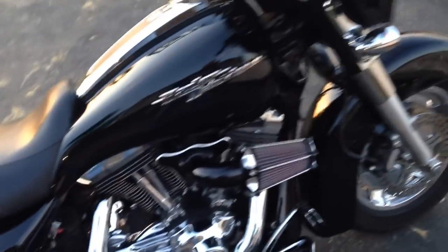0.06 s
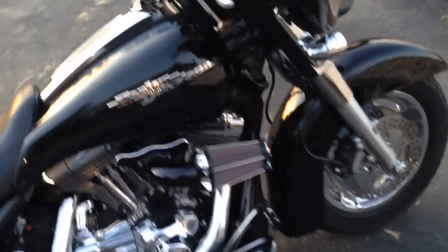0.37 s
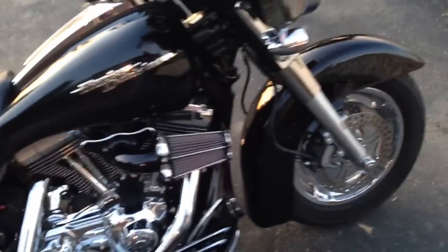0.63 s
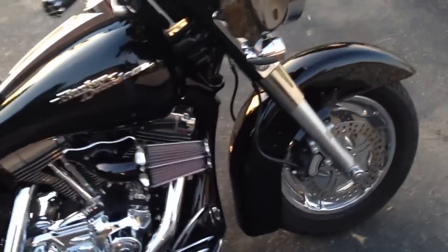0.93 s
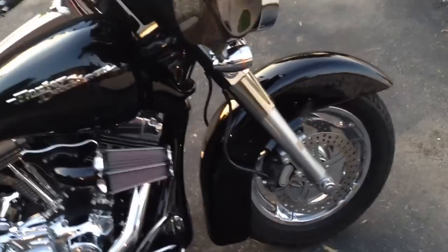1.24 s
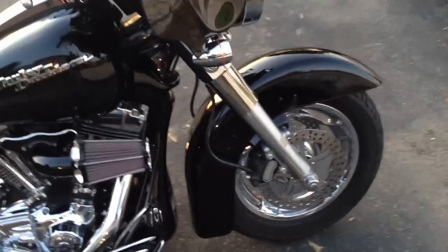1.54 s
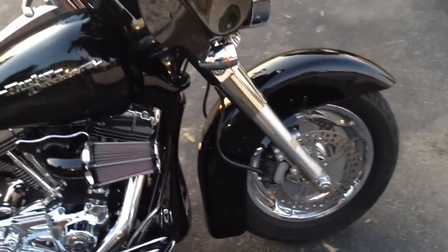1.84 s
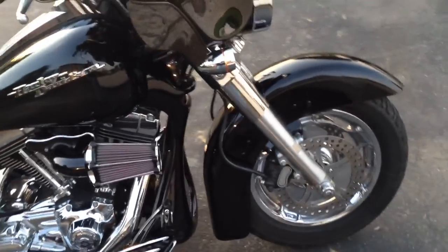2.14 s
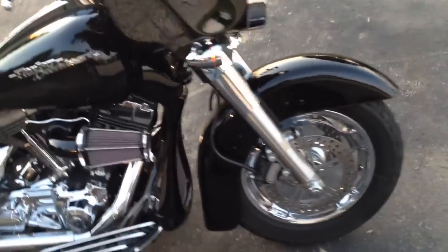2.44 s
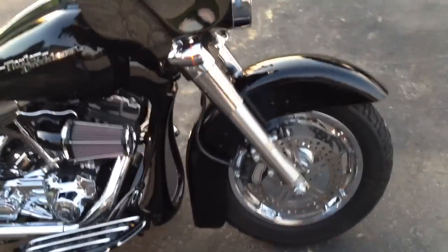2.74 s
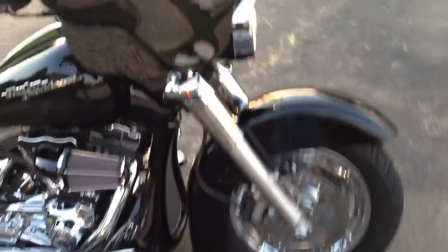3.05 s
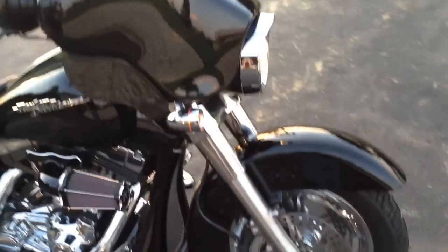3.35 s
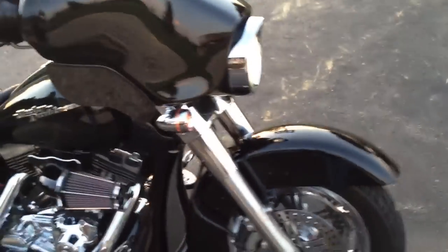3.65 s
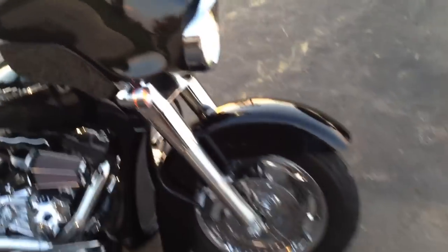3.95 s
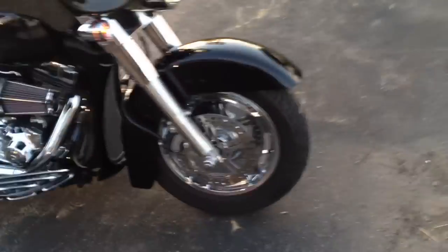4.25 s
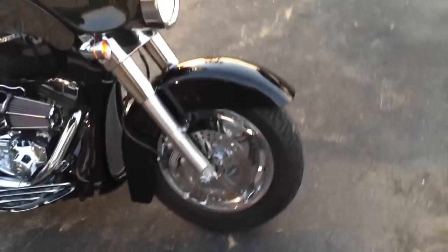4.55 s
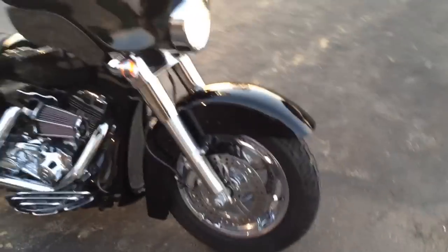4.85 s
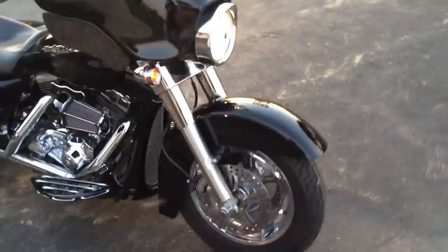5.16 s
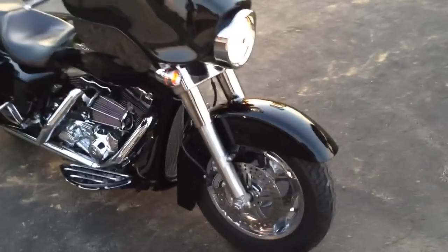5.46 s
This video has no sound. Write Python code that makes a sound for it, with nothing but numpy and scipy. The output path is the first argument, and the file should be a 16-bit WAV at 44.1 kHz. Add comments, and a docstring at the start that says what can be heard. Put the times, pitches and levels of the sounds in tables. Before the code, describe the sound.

Close, lumpy idle of a parked twin-cylinder motorcycle, its exhaust thudding and occasionally skipping over light metallic engine clatter.

```python
"""A big V-twin motorcycle idles in a parking lot, about eight cycles a second, with an uneven, loping beat.
One cylinder thuds, the other rings its pipe and now and then barely fires; gas rasps after every beat.
The hunting crankshaft speed times every beat and valve tap; the metal clatters close to a hand-held
microphone that drifts from beside the cylinders, past the fork, to ahead of the bike."""
import sys
import numpy as np
from scipy import signal
from scipy.fft import rfft, irfft, next_fast_len
from scipy.io import wavfile

SR = 44100
rng = np.random.default_rng(int(sys.argv[2]) if len(sys.argv) > 2 else 0)


def unload_audio(sound):
    """Save the sound as a 16-bit wav file, at the path given as the first command line argument."""
    columns = np.transpose(np.atleast_2d(sound))
    # keep every value between -1 and 1, then stretch to whole-number steps
    steps = np.round(np.clip(columns, -1, 1) * 32767)
    wavfile.write(sys.argv[1], SR, steps.astype(np.int16))


N = 250929

# resonances of each cylinder's exhaust pipe: (Hz, width Hz, dB, polarity at the outlet)
STEADY_PIPE = [(68.7, 7.15, 19.5, -1.0), (90.7, 10.2, 13.5, -1.0), (108, 8.5, 8, -1.0), (121, 80, 2, 1.0),
               (170.4, 10.2, 13.5, 1.0), (256, 130, -2, -1.0), (275.5, 44, -1.5, 1.0),
               (393, 33, 0, 1.0)]
LOPING_PIPE = [(70.3, 5.1, 18.5, -1.0), (90.4, 10.2, 13, -1.0), (106.2, 61.5, 16.5, 1.0),
               (129.8, 80.8, 20.5, -1.0), (167.3, 9.24, 25, 1.0), (213.6, 79, 8.5, 1.0),
               (267.8, 10.3, 3.5, -1.0), (428, 15, -7, 1.0)]
RUMBLE = [(15, -18), (30, -15), (65, 0), (170, 0), (210, -8), (400, -30), (900, -70)]  # fixed
# colour of the clatter beside the cylinders and beside the fork: (Hz, dB per Hz)
BESIDE_ENGINE = [(400, -52), (700, -0.5), (1000, 0.5), (1250, -3.5), (1600, 1), (2050, 0.5), (2400, -2), (3000, -2), (4700, -3), (6500, -9), (8000, -10.5), (11000, -17), (15400, -25)]
BESIDE_FORK = [(400, -20), (750, -4), (1250, -1), (1700, -2.5), (2000, -1.5), (2330, -6), (2700, -5), (3300, -1.5), (4400, -4.5), (6300, -6.5), (8000, -10), (11000, -17), (15400, -22)]
# ringing of the fins and of the covers: (Hz, width Hz, dB)
FINS = [(890, 75, 5), (1420, 40, 4.5), (1700, 130, 6), (2430, 110, 4), (2750, 60, 2), (3880, 170, 0), (5600, 220, -5)]  # fixed
COVERS = [(1410, 25, -3), (1740, 90, -1), (2290, 90, 4), (2400, 60, 1), (3230, 60, 3), (3450, 110, 0), (4270, 110, -5), (5600, 200, -10)]  # fixed
TOP_HZ = 15500  # fixed
# the hunting idle: (s, crankshaft rpm)
SPEED = [(0.0, 971.2), (0.4, 1022.2), (0.58, 969.9), (1.21, 983.3), (1.36, 931.0), (2.04, 960.4), (2.19, 898.4),
         (2.82, 1016.4), (3.21, 1040.5), (3.33, 985.1), (3.48, 1030.4), (4.25, 968.1), (4.53, 999.2), (4.82, 956.7),
         (4.92, 1015.0), (5.69, 952.4)]  # fixed
# where in the two-turn cycle each cylinder exhausts, and the valves close (cycles)
STEADY_AT, LOPING_AT, SEAT_AT = .2507, .691, .935  # fixed
STUMBLE_S = 0.002  # how late the next beat comes after a complete misfire
# how hard each cylinder fires: (s, strength dB)
STEADY_EFFORT = [(.35, 3), (.6, 0.5), (1.5, 0.5), (1.8, 2.4), (2.3, 0), (3.8, 0.5), (4.1, -0.5), (5.6, -1.5)]
LOPING_EFFORT = [(1.06, 3), (1.22, -2), (2.33, -0.7), (2.65, 1), (4.4, 1.3), (4.88, .6), (5.1, -1.5), (5.6, -1.5)]
# misfires of the loping cylinder: (s, drop in strength dB)
MISFIRES = [(.44, -7.5), (.69, -8.5), (.93, -8), (3.29, -4), (3.76, -6), (4.01, -13.5), (4.24, -10), (4.49, -20), (4.74, -21), (4.98, -4)]
# the microphone drifts forward: (s, place: 0 beside the cylinders, 1 beside the fork, 2 ahead of the bike)
PATH = [(1.1, 0.054), (1.9, 0.8), (3.1, 2.1), (4, 1.95)]
# loudness at the microphone: (s, exhaust rasp dB, engine clatter dB)
LOUDNESS = [(0, -30.5, -34), (1.83, -31, -37.5), (3, -28.5, -35.5), (4.3, -29, -38.5), (4.9, -28.5, -38), (5.65, -31, -40)]
# valve clicks heard from the three places (dB)
CLICK_DB = [-33.5, -32.5, -36.5]
# modes of each cylinder's rocker box: (Hz, dB from beside the cylinders, dB from beside the fork, dB from ahead)
STEADY_ROCKER = [(2266, -39, -43, -42), (2740, -34.5, -44, -38), (3025, -39, -33, -50), (3390, -39, -28, -40)]
LOPING_ROCKER = [(1720, -38, -45, -43), (2310, -40, -36, -34), (3420, -44, -32, -46)]
# valve taps that knock harder than the rest: (s, extra ring dB)
KNOCKS = [(.88, 3.5), (1.12, 5), (1.63, 7.5), (1.93, 5), (2.01, 1), (2.58, 7), (2.77, 6), (3.06, 11), (4.62, 3), (4.86, 9), (5.05, 4)]
# colour of the exhaust gas: (Hz, dB per Hz beside the cylinders, beside the fork, ahead)
RASP_COLOUR = [(120, -6, -3.5, -4.5), (233, 1, 0, -3.5), (297, -4, -0.5, -8), (390, 3, 0, 1.5), (458, -5, -2, -0.5),
               (619, -7, -9, -10), (772, -15, -16.5, -17.5), (1200, -24.5, -21, -26), (3000, -38, -41, -39.5)]
# colour of the clatter ahead of the bike: (Hz, dB per Hz)
AHEAD = [(400, -2), (750, -7.5), (1050, -0.5), (1330, -4.5), (1720, 0.5), (2000, -2), (2350, -1), (2750, -4), (3300, -1.5), (4400, -3.5), (6300, -9), (8000, -11.5), (11000, -17), (15400, -27)]
TAP_VARY_DB = 1.6  # fixed


def amp(db):
    """Decibels to gain."""
    return 10 ** (np.asarray(db) / 20)


def unit(x):
    """Scale to rms 1."""
    return x / np.sqrt(np.mean(x ** 2) + 1e-20)


def filtered(x, response):
    """x times a complex response of frequency."""
    m = next_fast_len(N + SR // 2)
    return irfft(rfft(x, m) * response(np.fft.rfftfreq(m, 1 / SR)), m)[:N]


def coloured(x, points):
    """x with a spectrum of (Hz, dB) points, at rms 1."""
    hz, db = np.transpose(points)
    return unit(filtered(x, lambda f: amp(np.interp(np.log(f + 1), np.log(hz), db))))


def resonance(f, hz, width):
    """Response of one damped mode."""
    return 1j * f * width / (hz * hz - f * f + 1j * f * width)


def pulses(times, db):
    """One impulse at each time."""
    return np.bincount(np.clip(np.round(times * SR).astype(int), 0, N), amp(db), N + 1)[:N]


def bursts(times, db, width):
    """A smooth swell around each time; width in seconds."""
    t = np.arange(-SR // 10, SR // 10 + 1) / SR
    return np.abs(signal.fftconvolve(pulses(times, db), np.exp(-.5 * (t / width) ** 2), 'same'))


def scatter(times, spread_db):
    """A random level for each time."""
    return spread_db * rng.standard_normal(len(times))


def pipe(beats, modes, level_db, vary_db, lead, lead_db, low_hz, high_hz):
    """Each blowdown pulse rings the pipe's modes, never twice in quite the same mix."""
    times, db = beats
    ring = np.zeros(N)
    for hz, width, mode_db, polarity in modes:
        blows = pulses(times, db + mode_db + scatter(times, vary_db))
        ring += np.sign(polarity) * filtered(blows, lambda f: resonance(f, hz, width))
    # a weaker dip in pressure runs a few milliseconds ahead of each pulse
    dip = lambda f: 1 - amp(lead_db) * np.exp(2j * np.pi * f * lead)
    # the open end radiates little deep bass, and the valve's gradual opening softens the top
    outlet = lambda f: (1j * f / (1j * f + low_hz)) ** 2 / (1 + 1j * f / high_hz) ** 2
    return amp(level_db) * filtered(ring, lambda f: dip(f) * outlet(f))


def rasp(flow=0.92, loping_share=0.24, echo_share=0.14, opening_share=.15, follows=0.8):
    """Turbulent gas leaks as the valve opens, leaves with each pulse and again when the pulse returns along the pipe."""
    (steady, steady_db), (loping, loping_db) = firings()
    gate = flow + bursts(steady + 0.0064, follows * steady_db, width=0.0047)
    gate += opening_share * bursts(loping - .014, follows * loping_db, width=0.0024)
    gate += loping_share * bursts(loping - .001, follows * loping_db, width=0.0089)
    gate += echo_share * bursts(loping + .018, follows * loping_db, width=0.005)
    hz, *colours = np.transpose(RASP_COLOUR)
    gas = sum(nearness(place) * coloured(rng.standard_normal(N), np.c_[hz, db]) for place, db in enumerate(colours))
    return unit(gate * gas)


def clatter(whirr_db=0, slap_db=-6, rocker_db=-5.5, seat_db=-11, fins_db=-3.5, covers_db=-3.0, far_covers_db=-7.0):
    """Dense tiny impacts of valves, gears and chain, bunched by the camshaft, ring the fins and covers."""
    (steady, _), (loping, _) = firings()
    closings = cycle_times(SEAT_AT)
    uneven = lambda times: scatter(times, 1.5)  # fixed
    slap = bursts(steady, slap_db + uneven(steady), width=0.0062)
    rocker = bursts(loping - .004, rocker_db + uneven(loping), width=0.018)
    seat = bursts(closings, seat_db + uneven(closings), width=0.00068)
    gate = amp(whirr_db) + slap + rocker + seat

    def heard(colour, modes, ring_db):
        metal = filtered(gate * grains(spiky=0.26), lambda f: sum(amp(db) * resonance(f, hz, width) for hz, width, db in modes))
        return coloured(gate * grains(spiky=0.13), colour) + amp(ring_db) * unit(metal)

    # the microphone moves forward, from the fins past the covers and then away
    places = [heard(BESIDE_ENGINE, FINS, fins_db), heard(BESIDE_FORK, COVERS, covers_db), heard(AHEAD, COVERS, far_covers_db)]
    return sum(nearness(place) * sound for place, sound in enumerate(places))


def pings(times, modes, t60, attack, detune):
    """Each valve tap rings the modes of its rocker box in a new mix, a few much harder than the rest."""
    t = np.arange(SR // 10) / SR
    fade = amp(-60 * t / t60) * (1 - np.exp(-t / attack))
    out = np.zeros(N + SR)
    for hz, *place_db in modes:
        levels = from_place(place_db, times) + accents(KNOCKS, times) + scatter(times, TAP_VARY_DB)
        for s, db, (bend, phase) in zip(times, levels, rng.standard_normal((len(times), 2))):
            out[round(s * SR):][:len(t)] += amp(db) * fade * np.sin(2 * np.pi * (hz * (1 + detune * bend) * t + phase))
    return out[:N]


def grains(spiky):
    """Noise made of tiny impacts of very unequal size."""
    size = np.repeat(rng.standard_normal(N // 16 + 1), 16)[:N]  # fixed
    return unit(rng.standard_normal(N) * np.exp(spiky * size))


def clicks(loping_db=-9, seat_db=-11, t60=0.057, attack=0.00074):
    """Valves snap in a bright chatter that starts at once and dies away: one hard and two soft snaps a cycle."""
    (steady, _), (loping, _) = firings()
    loping = loping - .006 + 0.0043 * rng.standard_normal(len(loping))
    snap = lambda times, db: pulses(times, from_place(CLICK_DB, times) + db + scatter(times, 1.3))  # fixed
    blows = snap(steady - .002, 0) + snap(loping, loping_db) + snap(cycle_times(SEAT_AT) - .002, seat_db)
    t = np.arange(SR // 10) / SR
    fading = signal.fftconvolve(blows, amp(-60 * t / t60) * (1 - np.exp(-t / attack)))[:N]
    colour = [(1500, -34), (3500, 4.5), (6000, 2.5), (8200, 8.0), (10500, -2), (15000, -2.5)]
    return fading * coloured(grains(spiky=0.14), colour)


def curve(rows, times, column=1):
    """A control's value at the given times."""
    columns = np.transpose(rows)
    return np.interp(times, columns[0], columns[column])


def cycle_times(phase):
    """When the engine passes one point of its four-stroke cycle."""
    t = np.arange(N) / SR
    cycles = np.cumsum(curve(SPEED, t)) / (120 * SR)  # fixed
    return np.interp(np.arange(phase, cycles[-1]), cycles, t)


def accents(rows, times):
    """The dB of each (s, dB) row, given to the beat that falls on it."""
    s, db = np.transpose(rows)
    return (np.abs(times[:, None] - s) < .025) @ db  # fixed


def from_place(levels, times):
    """A level that follows the microphone from place to place."""
    return np.interp(curve(PATH, times), np.arange(len(levels)), levels)


def firings():
    """(times, dB) of the steady and the loping cylinder; a misfire makes the next beat stumble."""
    steady, loping = cycle_times(STEADY_AT), cycle_times(LOPING_AT)
    drop_db = accents(MISFIRES, loping)
    steady = steady + STUMBLE_S * np.r_[0, 1 - amp(drop_db)][:len(steady)]
    return (steady, curve(STEADY_EFFORT, steady)), (loping, curve(LOPING_EFFORT, loping) + drop_db)


def nearness(place):
    """Gain of what is heard from one place, as the microphone passes through it."""
    return np.sqrt(np.clip(1 - np.abs(curve(PATH, np.arange(N) / SR) - place), 0, 1))


def scene():
    """Both pipes, their rasp, the engine's mechanics and a diffuse rumble from the lot."""
    t = np.arange(N) / SR
    s, rasp_db, clatter_db = np.transpose(LOUDNESS)
    level = lambda db: amp(np.interp(t, s, db))
    steady, loping = firings()
    beat = pipe(steady, STEADY_PIPE, level_db=26.0, vary_db=0.54, lead=0.00523, lead_db=-3.5, low_hz=41.4, high_hz=383)
    beat += pipe(loping, LOPING_PIPE, level_db=27.0, vary_db=0.5, lead=0.00575, lead_db=-9.5, low_hz=39.7, high_hz=414)
    gas = level(rasp_db) * rasp()
    metal = level(clatter_db) * clatter() + clicks()
    metal += pings(steady[0] - .0015, STEADY_ROCKER, t60=0.053, attack=0.00023, detune=0.022)
    metal += pings(loping[0] - .002, LOPING_ROCKER, t60=0.034, attack=0.00038, detune=0.031)
    rumble = amp(-32) * coloured(rng.standard_normal(N), RUMBLE)  # fixed
    return (beat + gas + metal + rumble)[None]


def record(dry):
    """The camera sheds the deepest bass and keeps nothing above its band limit."""
    low_cut = lambda f: f ** 3 / np.sqrt(f ** 6 + 33. ** 6)  # fixed
    return np.array([filtered(channel, lambda f: low_cut(f) * (f < TOP_HZ)) for channel in dry])


dry = scene()
out = record(dry)
unload_audio(out)
```